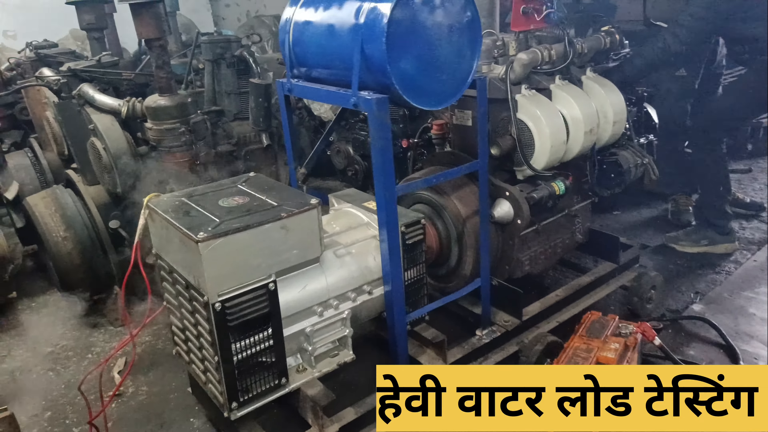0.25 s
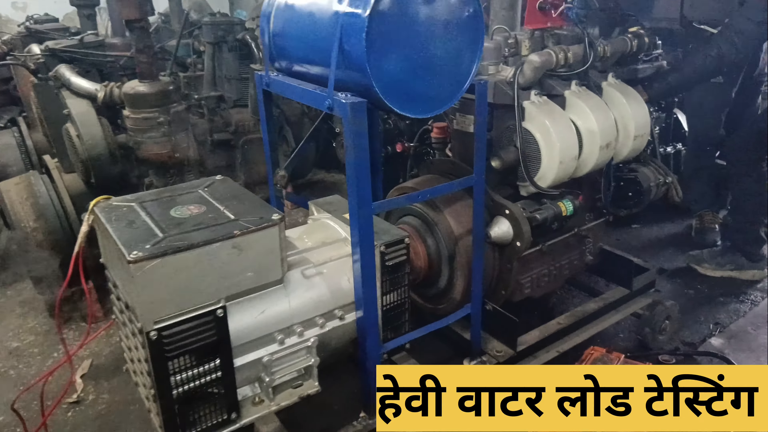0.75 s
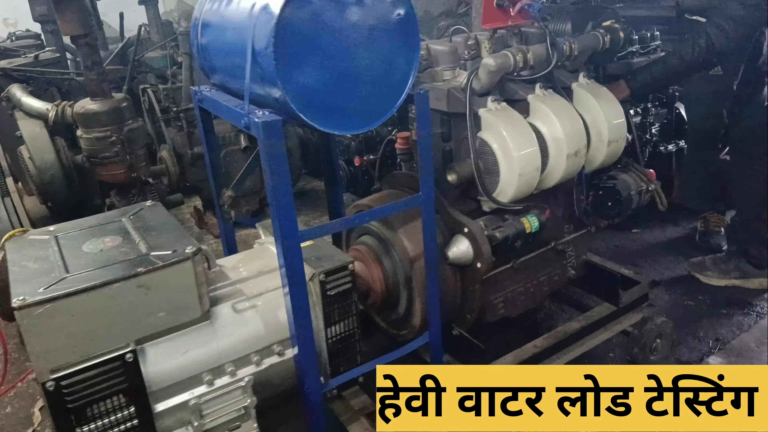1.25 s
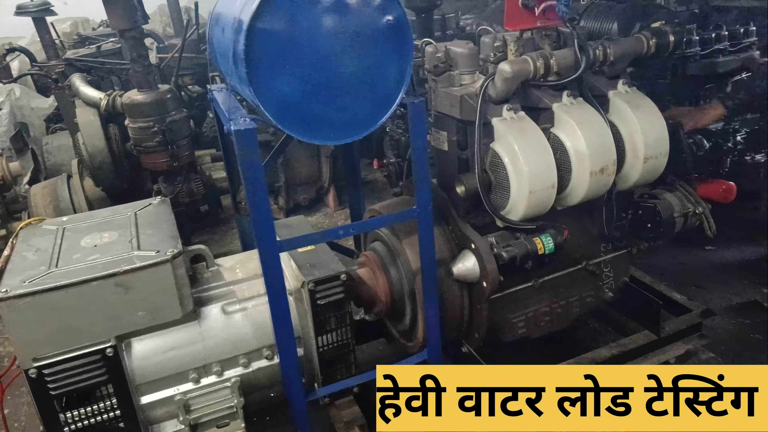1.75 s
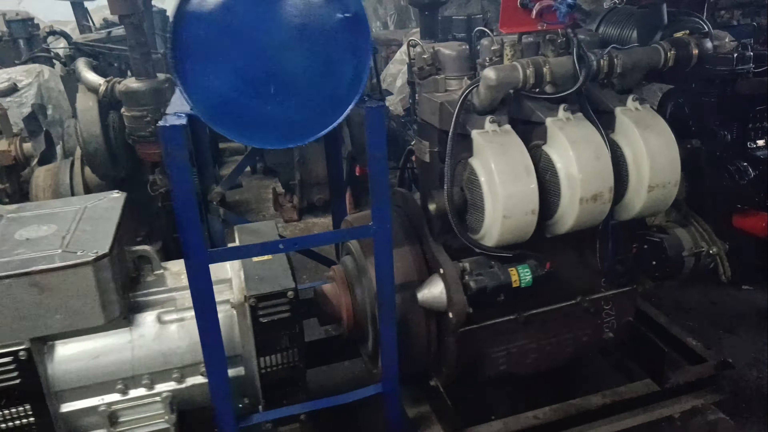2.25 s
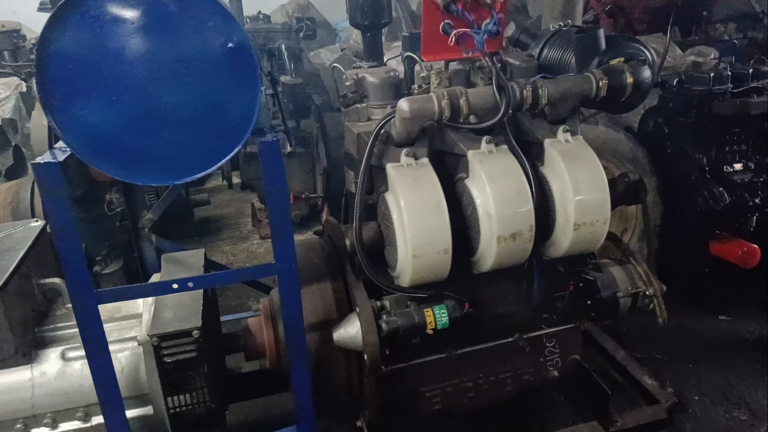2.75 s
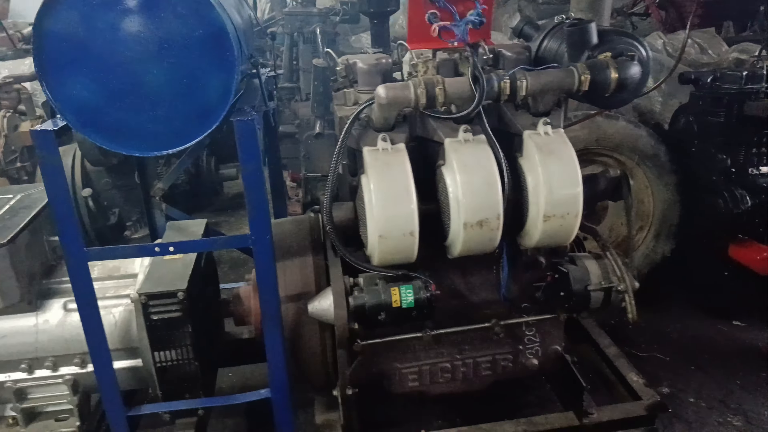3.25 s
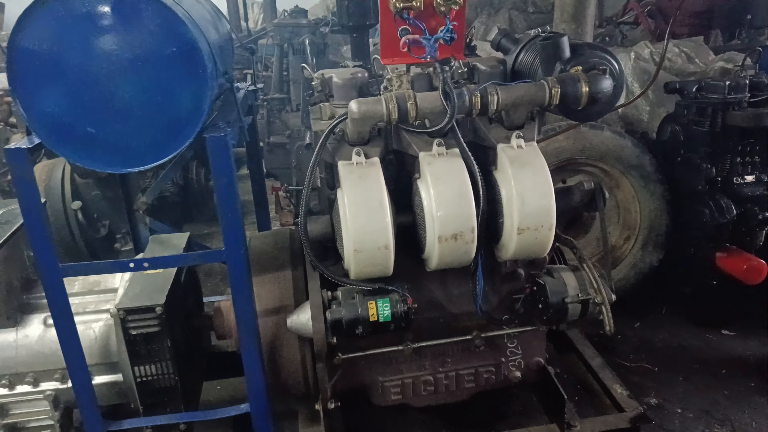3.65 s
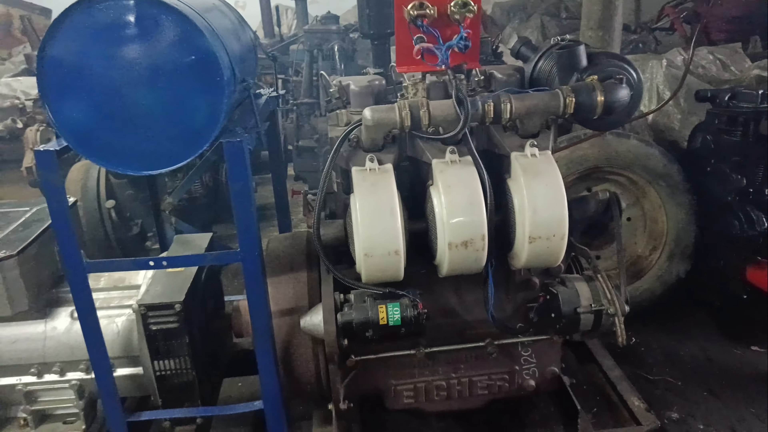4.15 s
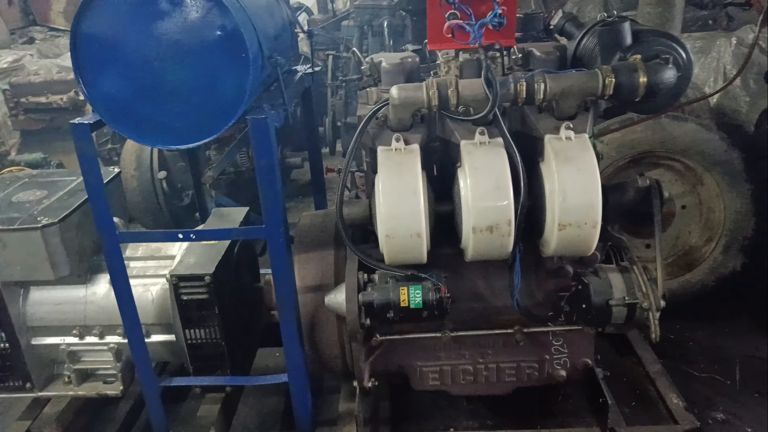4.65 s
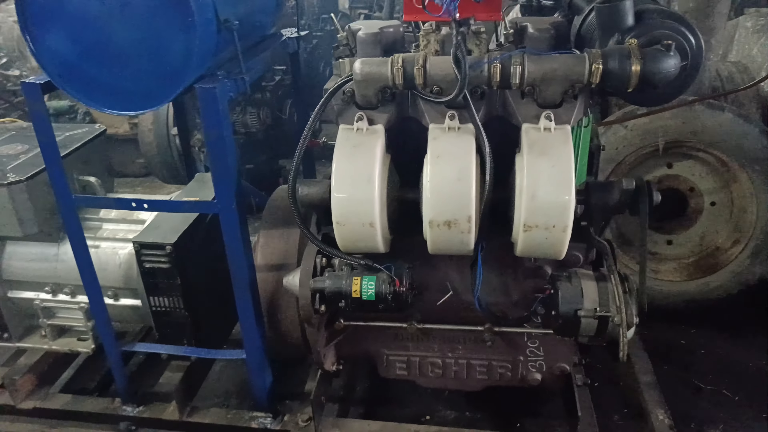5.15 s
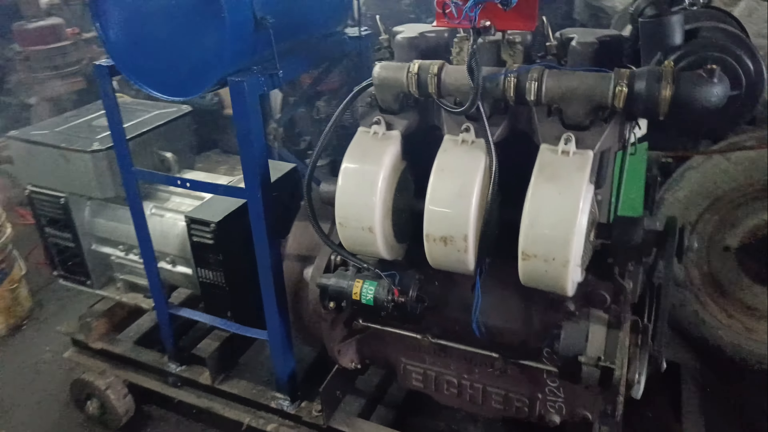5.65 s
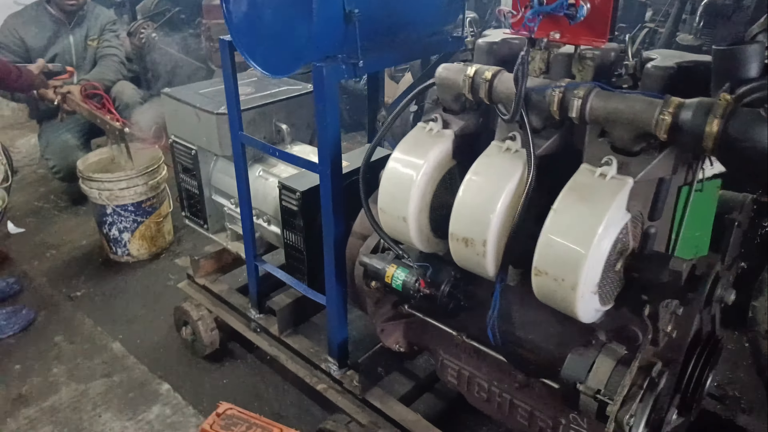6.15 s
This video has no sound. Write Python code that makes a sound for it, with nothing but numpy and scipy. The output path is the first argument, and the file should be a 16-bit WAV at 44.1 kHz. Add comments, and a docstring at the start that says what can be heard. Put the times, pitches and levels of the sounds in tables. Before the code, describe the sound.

A three-cylinder four-stroke diesel under generator load runs throughout about 6.4 seconds in a crowded workshop, heard close on a moving stereo phone. It is already running at the start, about 1540 rpm, with a low throb near 39 Hz and its harmonics, and hard mid-range metallic clatter whose uneven pattern nearly repeats every two turns. A steady roar of shop echo and cooling air fills the gaps; valve and injector hiss pulses in step, with fine sizzle on top. A thin wavering whistle near 2.9 kHz lasts until about 2.2 s, returns from 3.0 to 3.9, and fainter from 4.6 to 5.9. From 1.5 s the engine climbs slightly, peaking around 2.5 to 3.2 at 1560 rpm, then eases, sagging more clearly after 4.7 to about 1500. Passing the coupling and cylinders, the knocking becomes crisper and changes colour; it cuts off still running.

```python
"""In a crowded workshop a three-cylinder four-stroke diesel drives a generator under load; a phone is carried past.
The exhaust sounds as a harmonic series of the firing rate. Each firing knocks the block, whose damped modes
ring in a clatter that nearly repeats every two turns. Valves and injectors hiss in step as modulated noise,
the shop's echo and cooling air form a steady roar of shaped noise, and a thin wavering tone whistles in spells."""
import sys
import numpy as np
from scipy import signal
from scipy.fft import rfft, irfft
from scipy.io import wavfile
from scipy.ndimage import uniform_filter1d

SR = 44100
rng = np.random.default_rng(int(sys.argv[2]) if len(sys.argv) > 2 else 0)


def voltage_ratio(decibels):
    """Convert decibels (scalar or array-like) to amplitude ratios, 20 dB per decade."""
    exponent = np.asarray(decibels, float) / 20
    return 10 ** exponent


def dump_mix(stems):
    """Bounce the given channels to the path in sys.argv[1] as a 16-bit WAV at rate SR."""
    frames = np.atleast_2d(stems).T  # one column per channel
    limited = np.clip(frames, -1, 1)  # hard clip at full scale
    pcm = np.round(limited * 32767).astype(np.int16)
    wavfile.write(sys.argv[1], SR, pcm)


N = 282240  # samples, 6.4 s
CYCLES, STEPS = 96, 8192  # four-stroke cycles of two turns prepared, steps in each
PORT_LEAD = .002  # cycles by which one microphone port leads and the other lags the middle


def read(table, hz):
    """Interpolation on a log frequency axis: a table of (Hz, value) read at hz."""
    f, v = np.transpose(table)
    return np.interp(np.log(hz), np.log(f), v)


def curves(table, s):
    """Linear interpolation in time: the columns of a table at times s."""
    t, *columns = np.transpose(table)
    return np.array([np.interp(s, t, c) for c in columns])


def at_spot(levels, spot):
    """Linear interpolation in space: values at the spots of the walk, blended between neighbours."""
    return np.array([np.interp(spot, np.arange(len(row)), row) for row in levels])


def unit(x):
    """Normalisation of mean power: rms one."""
    return x / np.sqrt(np.mean(np.abs(x) ** 2))


def walk(rate):
    """Low-pass random fluctuation: levels held for 1 / rate s and smoothed twice, spread near 1."""
    hold = int(SR / rate)
    held = np.repeat(rng.standard_normal(N // hold + 1), hold)
    return 1.77 * uniform_filter1d(uniform_filter1d(held, hold), hold)[:N]


def colour(table, hz):
    """Spectral shaping: gains per order with total power one, silent above the table's last point."""
    gain = voltage_ratio(read(table, hz)) * (hz < table[-1][0])
    return gain / np.sqrt(np.sum(gain ** 2))


# How much of the noise returns each cycle. Each row: frequency in Hz, share from 0 to 1.
REPEATED_SHARE = [(100, .85), (400, .76), (650, .72), (870, .85), (1200, .55), (2200, .5), (2700, .06),
                  (8000, 0)]
# Coherence of the two channels. Each row: frequency in Hz, left-right likeness from 0 to 1.
COHERENCE = [(60, 0.83), (130, 1), (290, 0.89), (640, 0.74), (1410, 0.4), (3100, 0.13), (6820, 0),
             (15000, 0)]
# Stereo balance before the pan. Each row: frequency in Hz, left minus right in dB.
BALANCE = [(200, -1), (700, -.5), (1290, -2.5), (2380, 1.5), (4400, 1.5), (8120, -3), (15000, -6.5)]


def repeating(envelope, hz, memory_hz, grain_db=0, steady=True):
    """Cyclostationary noise: left and right spectra per cycle; the shared part lasts about memory_hz / hz cycles."""
    grain = voltage_ratio(grain_db * np.minimum(rng.exponential(size=(CYCLES, STEPS)), 4))
    noise = rng.standard_normal((2, CYCLES, STEPS)) * grain
    blows = np.fft.fft(rfft(envelope * noise), axis=1)
    # low-pass filtering from cycle to cycle makes the pattern return
    drift = np.exp(-(np.pi * np.fft.fftfreq(CYCLES)[:, None] * memory_hz / hz) ** 2)
    share = np.clip(read(REPEATED_SHARE, hz), 0, 1)
    keep = np.sqrt(share * drift / np.mean(drift, axis=0) + 1 - share)
    pattern = np.fft.ifft(blows * keep, axis=1)
    if steady:
        # power is evened over 11 orders and 11 cycles, so the noise stays steady
        power = uniform_filter1d(np.abs(pattern) ** 2, size=11, axis=2)
        pattern = pattern / np.sqrt(uniform_filter1d(power, size=11, axis=1))
    mid, side = unit(pattern)
    like = np.clip(read(COHERENCE, hz), -1, 1)
    mid, side = mid * np.sqrt((1 + like) / 2), side * np.sqrt((1 - like) / 2)
    lean = voltage_ratio(read(BALANCE, hz) / 2)
    return np.array([(mid + side) * lean, (mid - side) / lean])


def play(spectra, cycle):
    """Order-domain synthesis: the crank angle reads the patterns, blending to the next just before a firing."""
    patterns = irfft(spectra) * STEPS / np.sqrt(2)  # rms one for spectra of total power one
    turn = cycle + .56  # puts the change of pattern in the gap before the second firing
    row = turn.astype(int)
    blend = np.clip((turn - row - .98) / .02, 0, 1)
    step = cycle % 1 * STEPS
    k, part = step.astype(int), step % 1

    def sound_of(r):
        return patterns[:, r, k] * (1 - part) + patterns[:, r, (k + 1) % STEPS] * part

    return sound_of(row) * (1 - blend) + sound_of(row + 1) * blend


# Echo of the shop. Each row: frequency in Hz, relative power density in dB per Hz.
ECHO_SPECTRUM = [(20, -14), (50, -21), (65, -5.5), (100, -15.5), (250, -11), (420, -13.5), (650, -4.5),
                 (1000, -7), (2100, -10.5), (2650, -24.5), (4000, -30)]
# Cooling air. Each row: frequency in Hz, relative power density in dB per Hz.
AIR_SPECTRUM = [(1800, -49), (2600, -8), (3300, 3), (4300, -2.5), (6000, -5), (7600, -10), (9000, -45)]


def wash(cycle, hz, air_db):
    """Diffuse field: ungated noise stands for the shop's echo of the engine below and cooling air above."""
    echo_level = voltage_ratio(-21.5 + 0.2 * walk(2.14))
    echo = echo_level * play(repeating(1., hz, memory_hz=4500) * colour(ECHO_SPECTRUM, hz), cycle)
    air_level = voltage_ratio(air_db + .5 * walk(3.5))
    air = air_level * play(repeating(1., hz, memory_hz=2500) * colour(AIR_SPECTRUM, hz), cycle)
    return echo + air


# Spells of the whistle. Each row: start in seconds, length in seconds, rms level in dB before the flutter.
WHISTLE_SPELLS = [(-.3, 2.5, -52), (3.0, 0.9, -52), (4.6, 1.3, -57)]


def whistle(s):
    """Frequency and amplitude modulation: a thin tone wavers about 2889 Hz and fades in and out in spells."""
    fade_s, flutter_db = .25, 1.2
    spells = 0
    for start, length, db in WHISTLE_SPELLS:
        inside_s = np.minimum(s - start, start + length - s)
        spells = spells + voltage_ratio(db) * np.clip(inside_s / fade_s, 0, 1)
    spells = spells * voltage_ratio(flutter_db * walk(22))
    pitch_hz = 2889 + 1.36 * walk(6.3)
    return np.sqrt(2) * spells * np.sin(2 * np.pi * np.cumsum(pitch_hz) / SR)


# Three firings and a valve-gear blow. Each row: place in the cycle from 0 to 1, then relative levels
# in dB of rattle, hiss and crack.
BLOWS = [(.14, 0, 0, 0), (.472, 0.5, -1, 1), (.805, -.5, -1, -1), (.94, -5, -4, -8)]


def strokes(levels_db, accent_db, rise, fall, floor_db, scatter_db):
    """Impulsive excitation: over a floor, each blow rises fast and decays slower (in cycles), its size varying."""
    place = np.arange(STEPS) / STEPS
    out = np.full((CYCLES, STEPS), voltage_ratio(floor_db))
    for k, chance in enumerate(rng.standard_normal((len(BLOWS), CYCLES, 1))):
        after = (place - BLOWS[k][0]) % 1
        size = voltage_ratio(levels_db[k] + accent_db * (k == 0) + scatter_db * chance)
        out = out + size * (1 - np.exp(-after / rise)) * np.exp(-after / fall)
    return out


def puffing(cycle, hz, table, floor_db, scatter_db, grain_db, flicker_db):
    """Amplitude-modulated noise: treble swells with the blows over a floor, uneven from cycle to cycle."""
    hiss_db = np.array(BLOWS)[:, 2]
    puffs = strokes(hiss_db, 0, rise=0.027, fall=0.089, floor_db=floor_db, scatter_db=scatter_db)
    noise = repeating(puffs, hz, memory_hz=2500, grain_db=grain_db, steady=False)
    return voltage_ratio(flicker_db * walk(16)) * play(noise * colour(table, hz), cycle)


# Valve hiss. Each row: frequency in Hz, relative power density in dB per Hz.
VALVE_SPECTRUM = [(2500, -21), (4400, -9), (5500, 0), (7200, -4.5), (7900, -14), (9000, -14)]
# Smooth injector hiss, around 8 to 12 kHz. Each row: frequency in Hz, relative power density in dB per Hz.
INJECTOR_SPECTRUM = [(6000, -29), (8000, -12), (8600, 0), (9900, 8.5), (11000, 1.5), (12000, -2.5)]
# Top sizzle. Each row: frequency in Hz, relative power density in dB per Hz.
SIZZLE_SPECTRUM = [(9000, -29), (11500, -11), (12200, 0), (13800, 4), (14800, -1), (15700, 5.5),
                   (16500, -3)]


def valves(cycle, hz, valve_db, injector_db, sizzle_db):
    """Band-limited noise sources: grainy valve hiss, smooth injector hiss above it and a fine sizzle on top."""
    hiss = puffing(cycle, hz, VALVE_SPECTRUM, floor_db=0, scatter_db=4.5, grain_db=2.8, flicker_db=0.5)
    # swells gently with the blows
    smooth = puffing(cycle, hz, INJECTOR_SPECTRUM, floor_db=-0.5, scatter_db=4.0, grain_db=0.5, flicker_db=0.5)
    sizzle = puffing(cycle, hz, SIZZLE_SPECTRUM, floor_db=2, scatter_db=4, grain_db=2.4, flicker_db=.8)
    return voltage_ratio(valve_db) * hiss + voltage_ratio(injector_db) * smooth + voltage_ratio(sizzle_db) * sizzle


# Standing waves of the shop favour other firing orders at each spot.
# Each row is one order: rms level in dB at spots 0, 1, 2, 3 and 4.
EXHAUST_ORDERS = [(-30.5, -28, -29.5, -29.5, -31), (-23.5, -46, -39, -35, -33),
                  (-28.5, -25, -27, -27.5, -30.5), (-31.5, -29, -34, -39.5, -35), (-36, -39, -63, -37, -38),
                  (-53, -48.5, -68, -52, -38.5)]
# Pulse shape at spots 0 to 4. Each row: lag of each higher exhaust order in turns of phase, extra smear in
# turns of phase, lag of the engine noise in cycles, first cylinder's accent in dB, crack over rattle in dB.
PULSE_SHAPE = [(.42, -.02, 0, -1, -6), (.22, .075, 0, .5, -2.5), (.22, .08, 0, 1.5, -.5),
               (.27, .065, .02, 2, -1.5), (.35, .04, .035, 1.5, -2)]


def exhaust(spot, cycle):
    """Fourier series of the firing rate: the lags of the higher orders smear the pulse of each firing."""
    lag, smear = at_spot(np.transpose(PULSE_SHAPE), spot)[:2]
    # the pulse reaches one microphone port a little before the other
    firing = 3 * (cycle + np.array([[PORT_LEAD], [-PORT_LEAD]]))
    out = 0
    for k, size in enumerate(at_spot(voltage_ratio(np.array(EXHAUST_ORDERS)), spot)):
        phase = (k + 1) * firing - k * lag - k * k * smear
        out = out + np.sqrt(2) * size * np.cos(2 * np.pi * phase)
    return out


def cracks(accent_db, wander, scatter_db):
    """Shift theorem: linear phase places a sharp crack just after each blow, its timing wandering by cycle."""
    order, out = np.arange(STEPS // 2 + 1), 0
    for k, (late, size) in enumerate(rng.standard_normal((len(BLOWS), 2, CYCLES, 1))):
        # the crack follows the start of the rattle by .025 cycle
        at = BLOWS[k][0] + .025 + wander * uniform_filter1d(late, size=7, axis=0)
        # each cylinder sits at its own side of the two microphone ports
        at = at + PORT_LEAD * np.cos(2 * k) * np.array([[[1]], [[-1]]])
        level = voltage_ratio(BLOWS[k][3] + accent_db * (k == 0) + scatter_db * size)
        out = out + level * np.exp(-2j * np.pi * order * at)
    return unit(out)


# Modes of engine block and frame. Each row: frequency in Hz, width in Hz.
BLOCK_MODES = [(370, 22), (480, 270), (575, 116), (650, 42), (750, 37), (833, 15.3), (905, 24.5), (985, 38),
               (1080, 36), (1180, 27), (1450, 270), (2000, 117)]
# Each mode radiates to its own side. Each row is one mode: level in dB, before the band limits of the block,
# at each of the spots in MODE_SPOTS.
MODE_LEVELS = [(-33, -44, -52, -37, -37, -34.5, -40, -40, -42),
               (-28.5, -29.5, -30.5, -35, -39, -39, -37.5, -43, -47),
               (-44, -41, -47, -36, -34.5, -34.0, -37.0, -35, -51),
               (-35, -41, -30, -36, -30, -27, -29.5, -30, -38),
               (-37.5, -30.5, -53, -44, -55, -28, -37, -26.5, -32),
               (-29, -26, -27.5, -32, -26.5, -30, -32.0, -34.5, -22.5),
               (-35, -32.5, -30.5, -26.5, -33.5, -32, -28.5, -26, -31),
               (-35, -35.0, -25.5, -28.5, -34, -28, -24, -33, -28),
               (-31, -34, -31, -33, -33, -45, -35, -50, -33),
               (-33, -31.5, -35, -28.5, -31, -26, -30.5, -30, -25),
               (-31, -30, -48, -37.5, -30, -38, -32.0, -27, -27),
               (-35, -40, -43, -32.0, -30, -32.5, -39, -43, -31)]
# Spots of the walk where the columns of MODE_LEVELS are heard.
MODE_SPOTS = [0, .5, 1, 1.25, 1.75, 2.5, 3, 3.5, 4]


def knock(cycle, hz, spot, pace):
    """Modal resonance: combustion cracks and the rattle after them ring the damped modes of block and frame."""
    body, now = 0, hz * pace[:, None]  # the modes keep their pitch while the orders follow the speed
    for k, ((f, width), levels) in enumerate(zip(BLOCK_MODES, MODE_LEVELS)):
        mode = 1j * now * width / (f * f - now * now + 1j * now * width)
        mode = mode / np.sqrt(np.sum(np.abs(mode) ** 2, axis=1, keepdims=True))
        size = voltage_ratio(np.interp(spot, MODE_SPOTS, levels))[:, None]
        body = body + (-1) ** (k // 3) * size * mode  # groups of modes swing in opposite directions
    # the block radiates little outside the span of its modes
    body = body / (1 + 1j * (hz / 2300) ** 6) / (1 + (230 / hz) ** 4)
    accent_db, crack_db = at_spot(np.transpose(PULSE_SHAPE), spot)[3:, :, None]
    rattle_db = np.array(BLOWS)[:, 1]
    rattle = strokes(rattle_db, accent_db, rise=.01, fall=.075, floor_db=-15, scatter_db=1.1)
    force = repeating(rattle, hz, memory_hz=8000)
    force = force + voltage_ratio(crack_db) * cracks(accent_db, wander=.002, scatter_db=.8)
    return play(force * body / np.sqrt(1 + voltage_ratio(crack_db) ** 2), cycle)


# Crankshaft, rising and then sagging under load. Each row: time in seconds, speed in rpm.
CRANK_SPEED = [(0.0, 1541), (1.0, 1541.5), (1.6, 1545), (2.0, 1551), (2.45, 1560), (3.2, 1560.5),
               (3.5, 1559.5), (4.0, 1555), (4.7, 1549), (5.6, 1525.5), (6.4, 1502.2)]
# The phone's walk. Each row: time in seconds, spot (0 generator end, 1 coupling, 2 and 3 beside the
# cylinders, 4 fan end).
PHONE_WALK = [(0, 0), (1.0, .03), (1.8, .5), (2.7, 1), (4.3, 1.5), (5.3, 3), (6.4, 4)]


def scene():
    """Superposition: all layers but the whistle ride on one crank angle, all heard by one moving listener."""
    s = np.arange(N) / SR
    rpm = curves(CRANK_SPEED, s)[0]
    mean_rpm = np.mean(np.array(CRANK_SPEED)[:, 1])
    cycle = -.112 + np.cumsum(rpm) / 120 / SR  # two turns to a cycle
    spot = curves(PHONE_WALK, s)[0]
    cycle_spot = np.interp(np.arange(CYCLES), cycle, spot)
    pace = np.interp(np.arange(CYCLES), cycle, rpm) / mean_rpm
    hz = np.maximum(np.arange(STEPS // 2 + 1), .5) * mean_rpm / 120
    # level in dB at the generator end, and its change per spot walked
    air_db = -37 - 0.5 * spot
    valve_db = -37.5 + 0.4 * spot
    injector_db = -48 + 0.8 * spot
    sizzle_db = -50.5 + 0.4 * spot
    pan_db = -.6 + .4 * spot  # left minus right
    heard = cycle - at_spot(np.transpose(PULSE_SHAPE), spot)[2]
    engine = knock(heard, hz, cycle_spot, pace) + wash(heard, hz, air_db)
    engine = engine + valves(heard, hz, valve_db, injector_db, sizzle_db)
    pan = voltage_ratio(np.array([pan_db, -pan_db]) / 2)
    return exhaust(spot, cycle) + (engine + whistle(s)) * pan


def top_cut(x):
    """Nothing passes above the cut-off."""
    return signal.sosfilt(signal.butter(12, 16640, fs=SR, output="sos"), x)


def record(dry):
    """Saturation and low-pass filtering: the phone rounds the highest peaks; a steep low-pass ends at 15720 Hz."""
    rounded = np.tanh(.8 * dry) / .8
    low_pass = signal.ellip(12, .3, 70, 15720, fs=SR, output="sos")
    mix = signal.sosfilt(low_pass, rounded)
    return top_cut(mix)


dry = scene()
out = record(dry)
dump_mix(out)
```